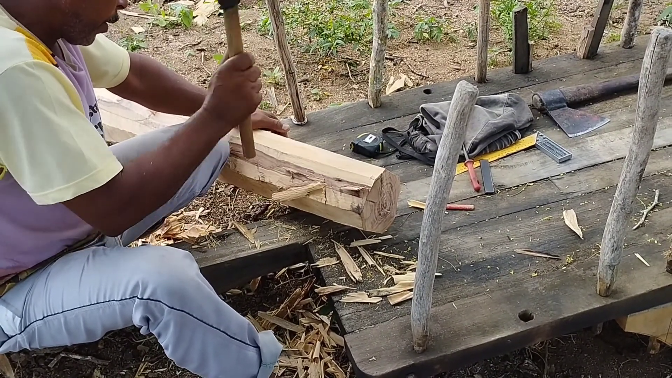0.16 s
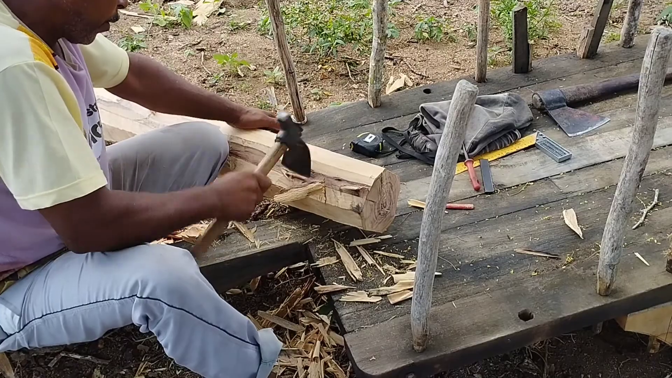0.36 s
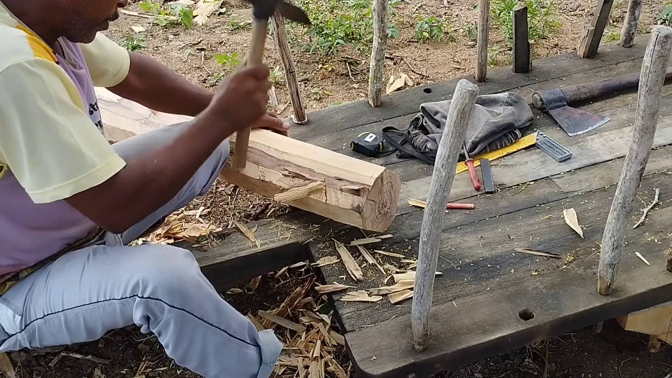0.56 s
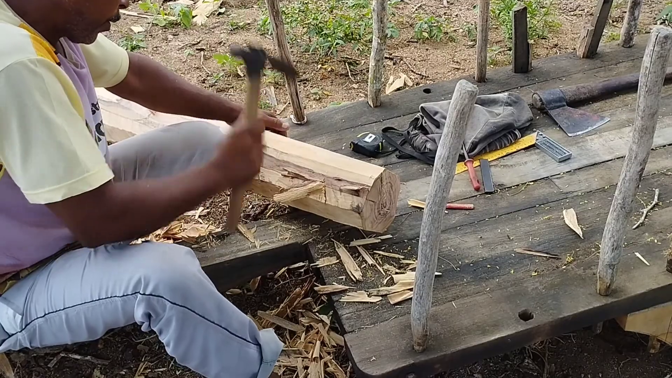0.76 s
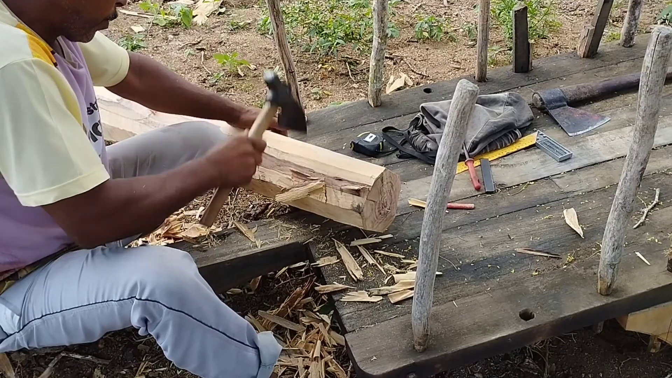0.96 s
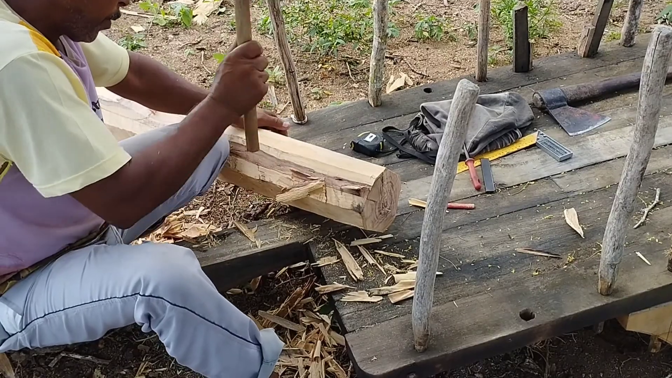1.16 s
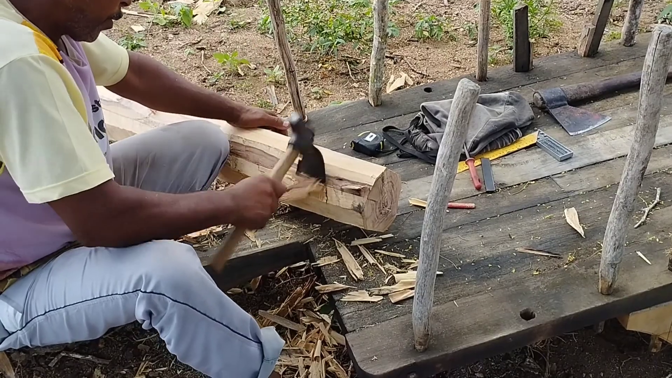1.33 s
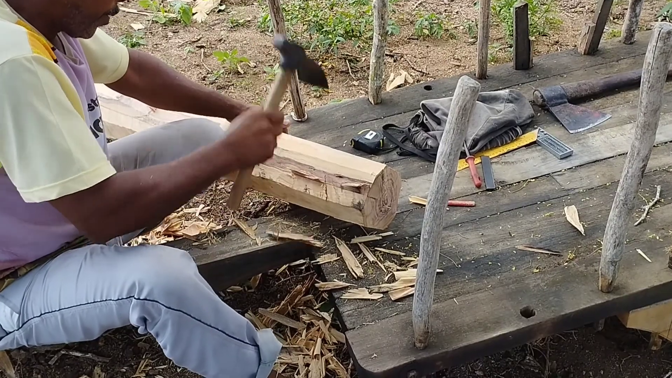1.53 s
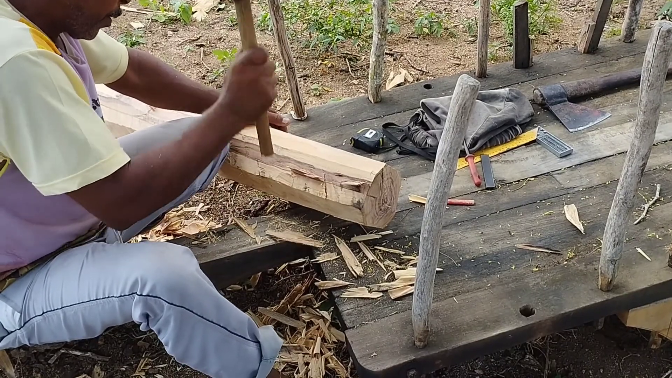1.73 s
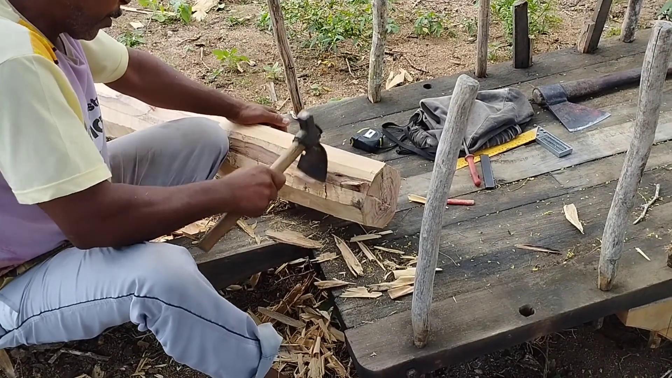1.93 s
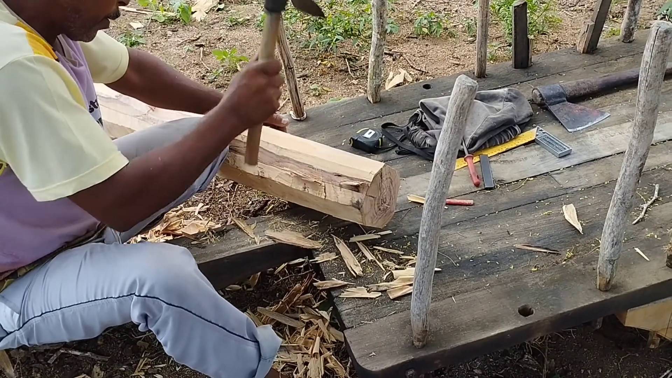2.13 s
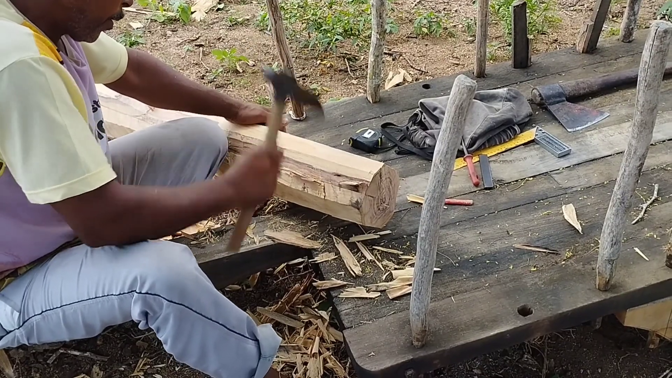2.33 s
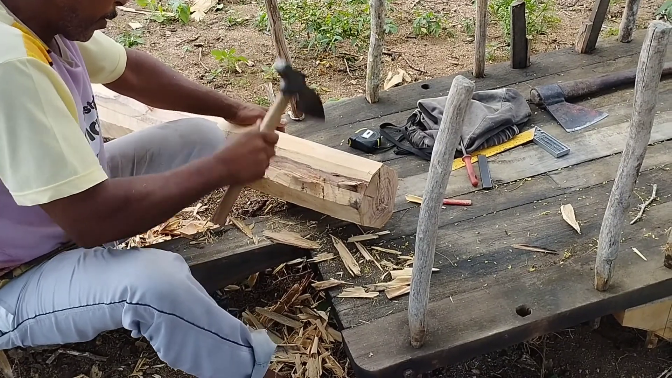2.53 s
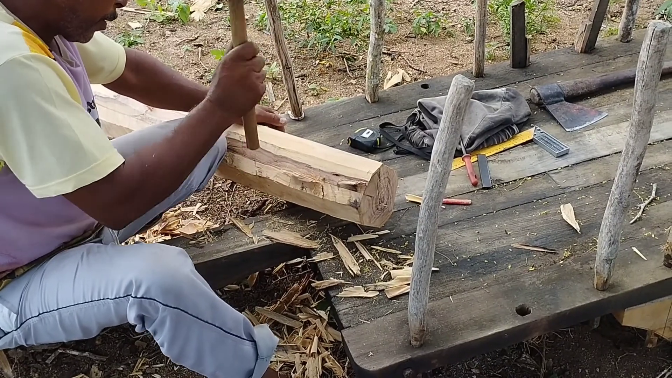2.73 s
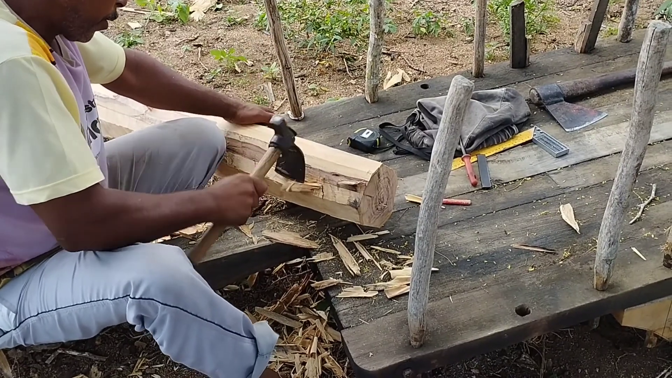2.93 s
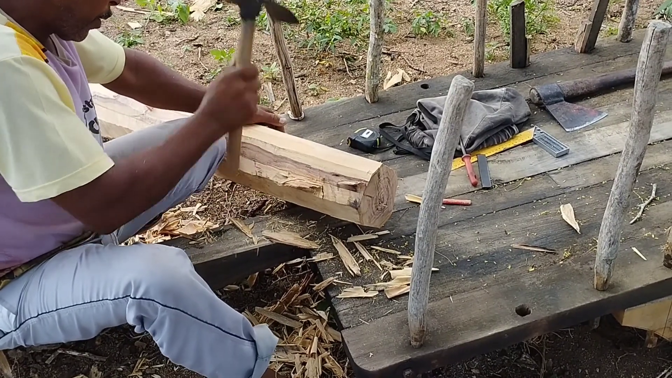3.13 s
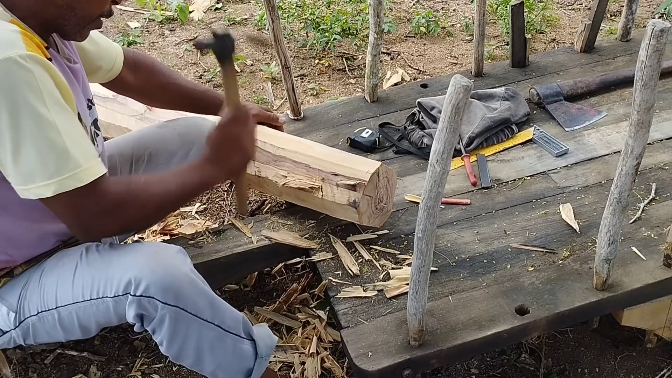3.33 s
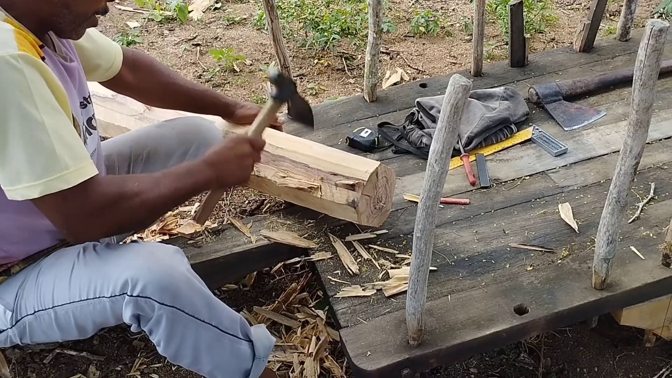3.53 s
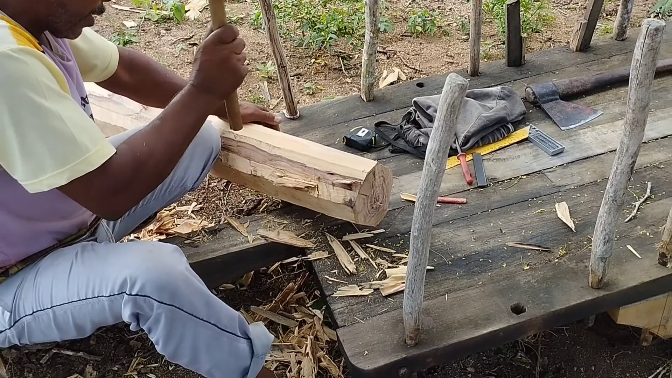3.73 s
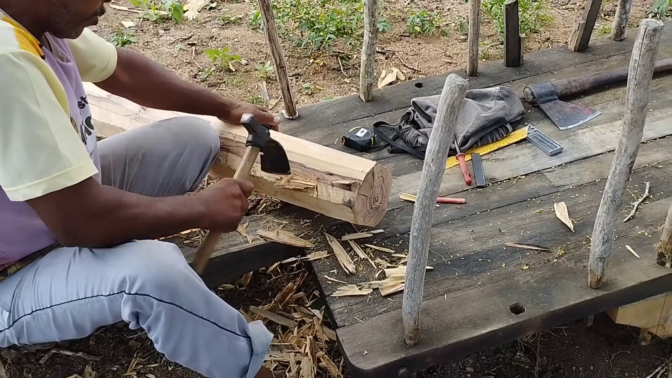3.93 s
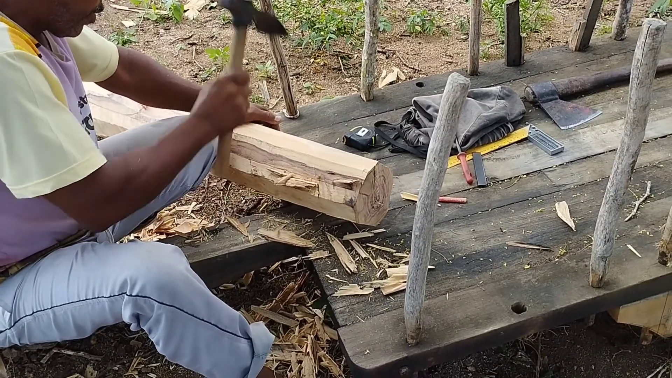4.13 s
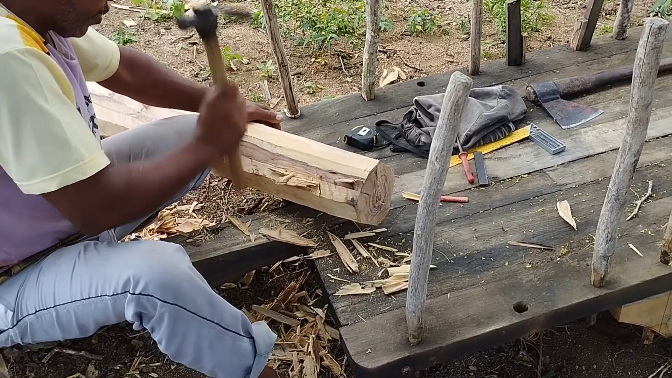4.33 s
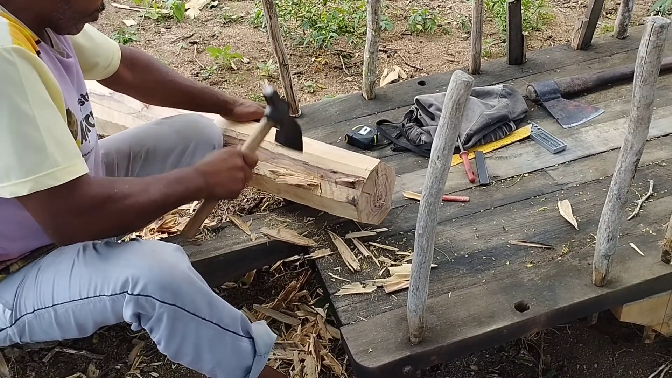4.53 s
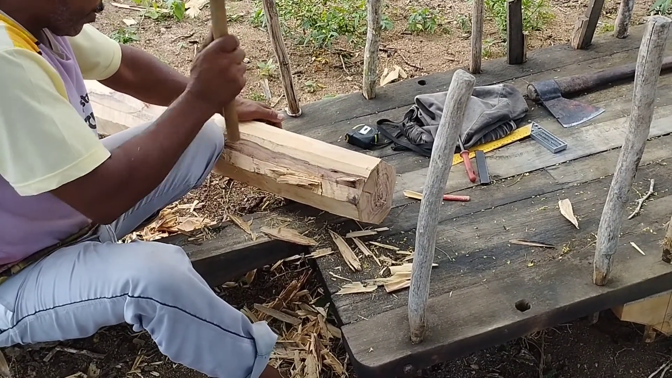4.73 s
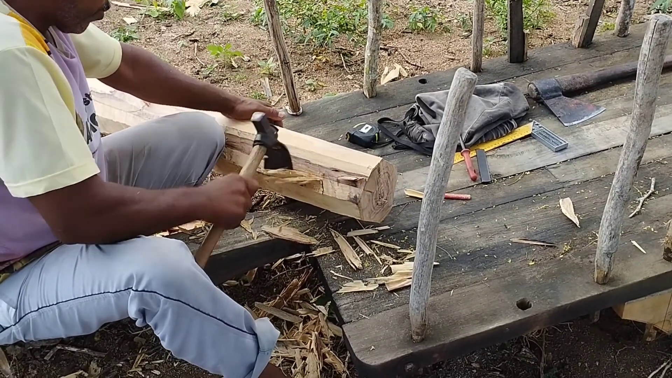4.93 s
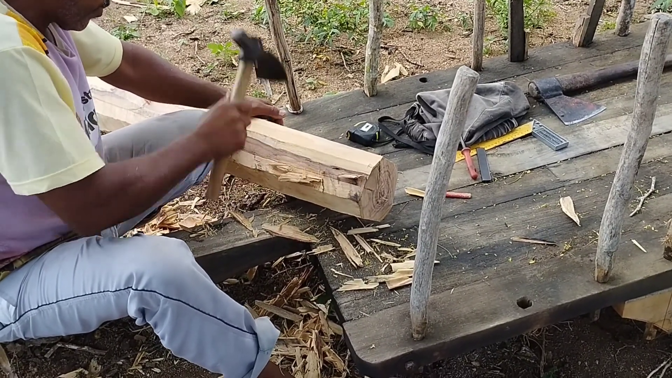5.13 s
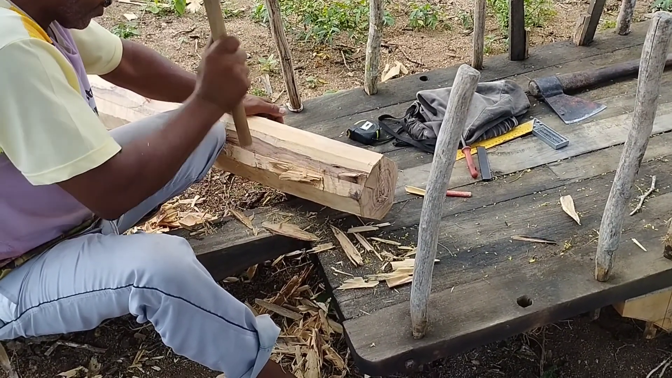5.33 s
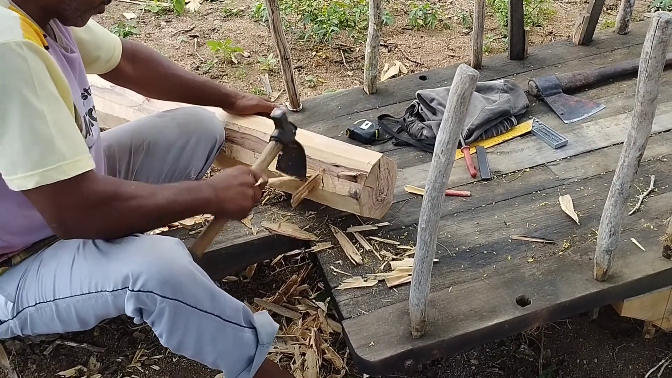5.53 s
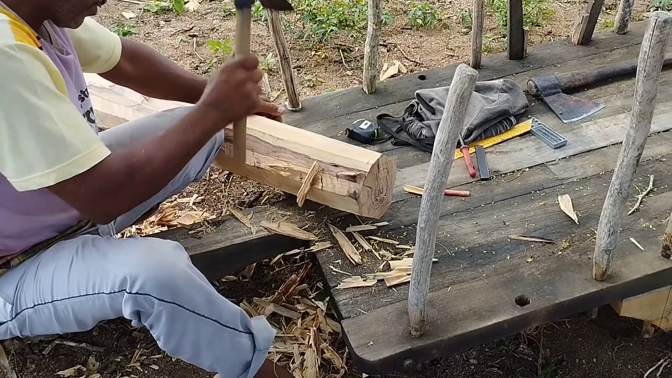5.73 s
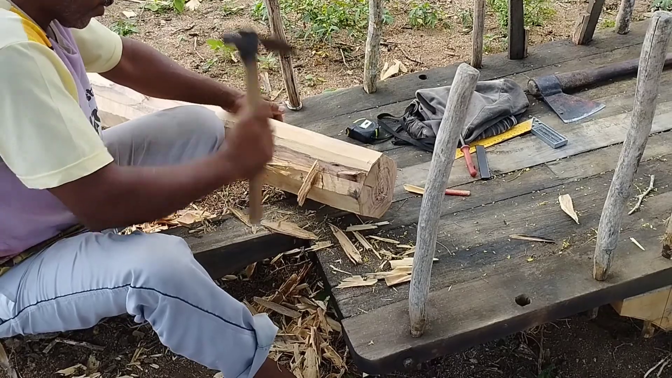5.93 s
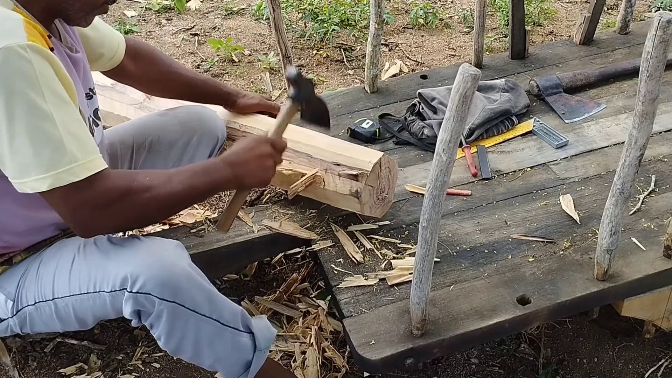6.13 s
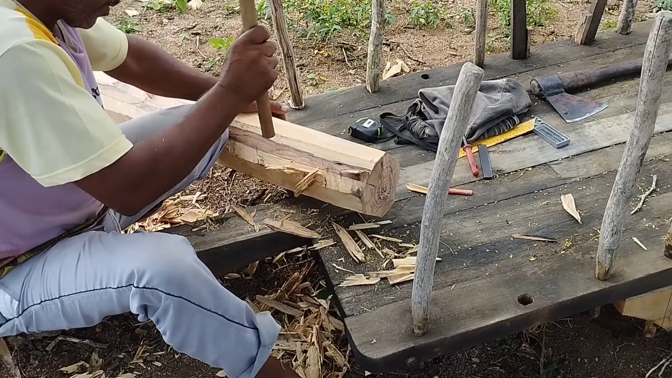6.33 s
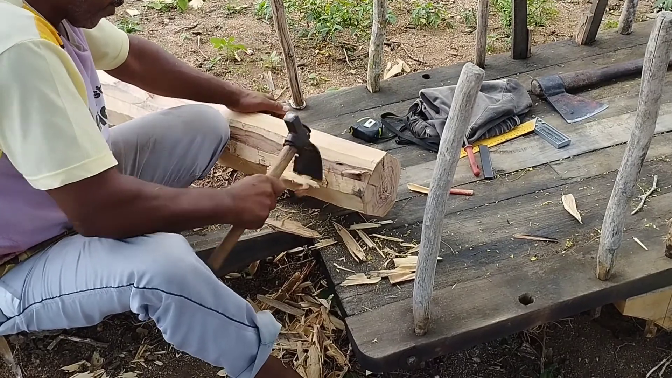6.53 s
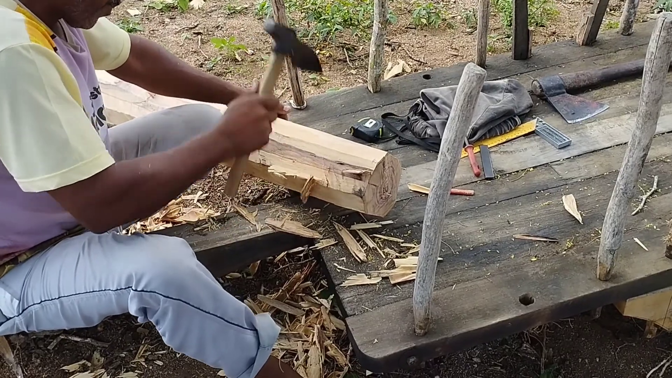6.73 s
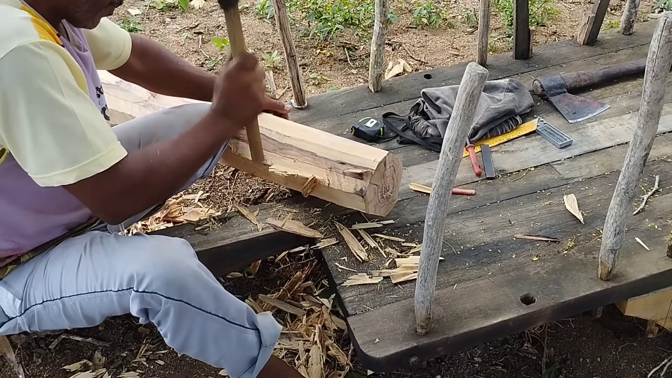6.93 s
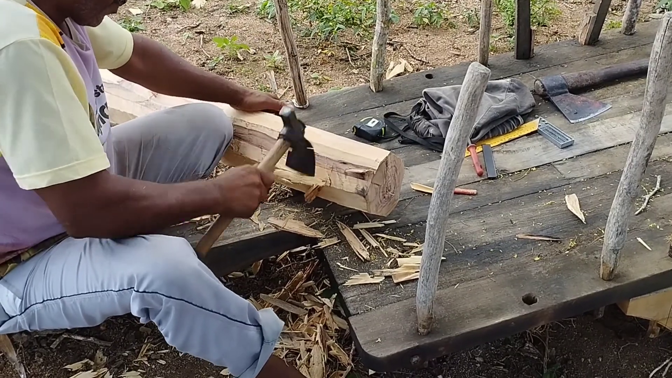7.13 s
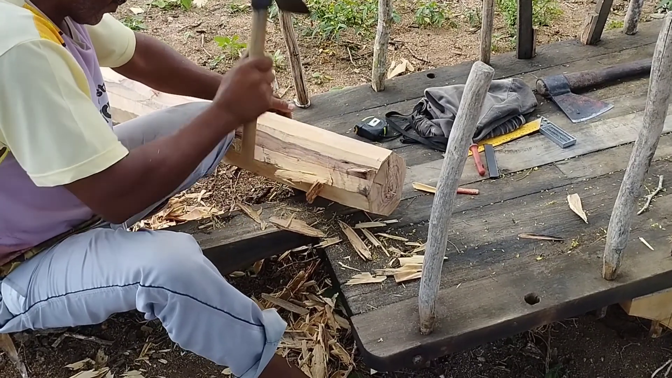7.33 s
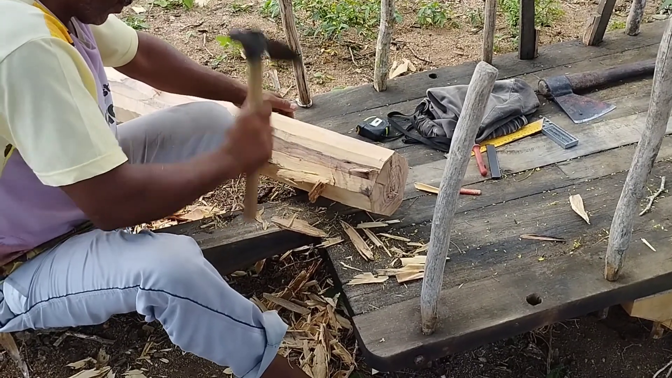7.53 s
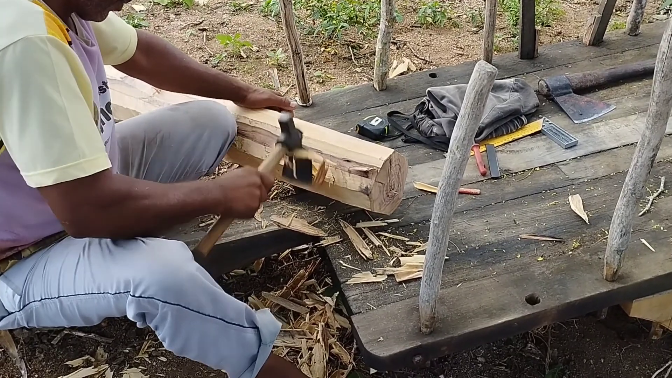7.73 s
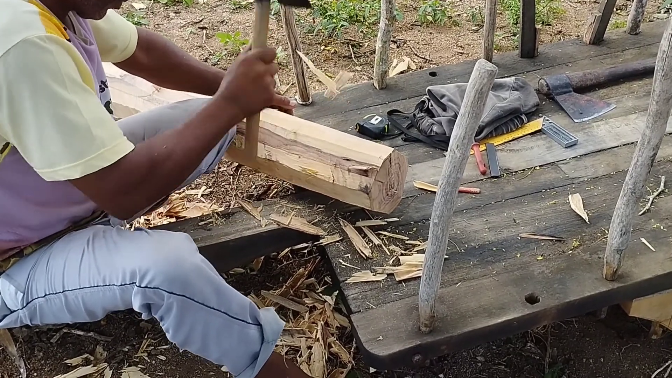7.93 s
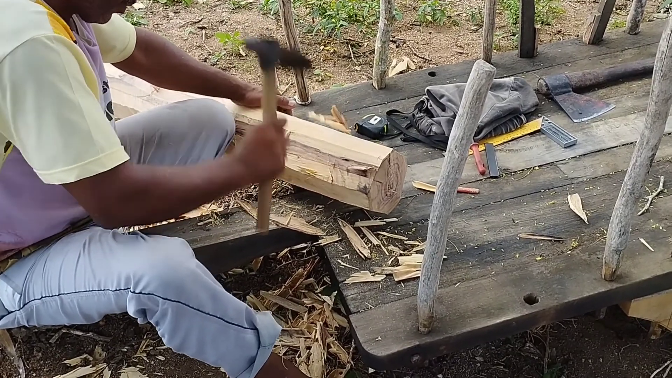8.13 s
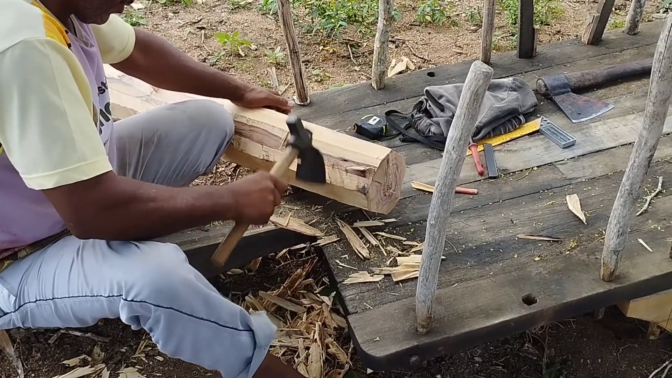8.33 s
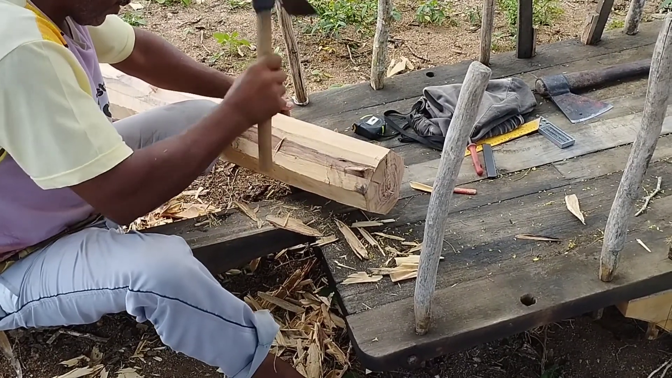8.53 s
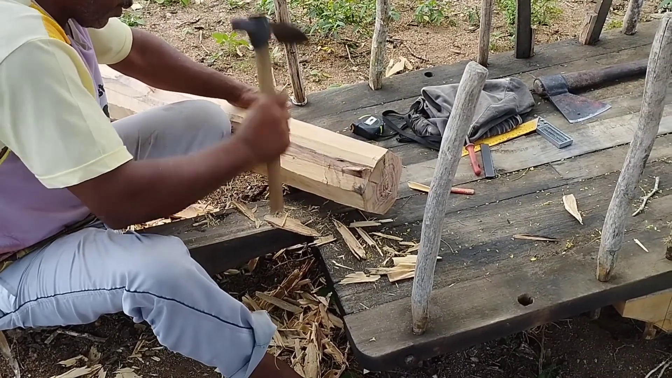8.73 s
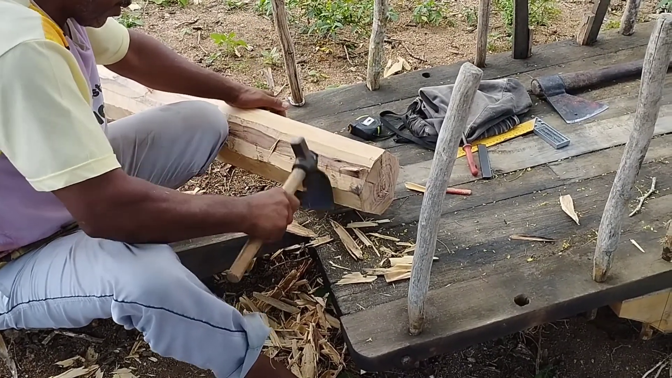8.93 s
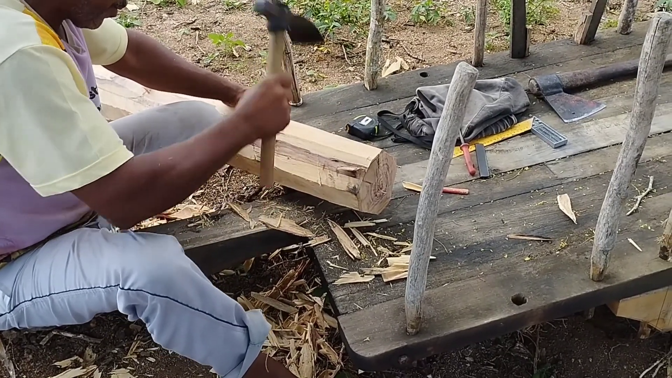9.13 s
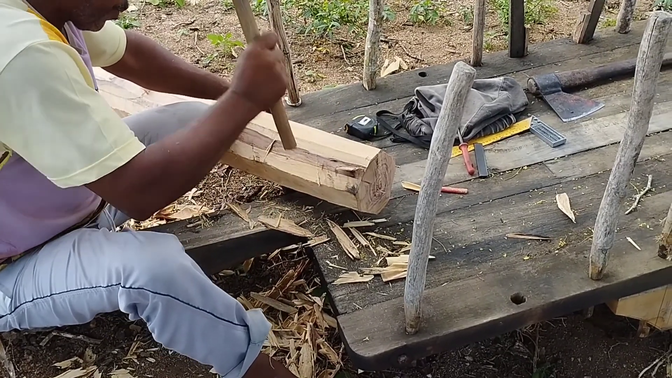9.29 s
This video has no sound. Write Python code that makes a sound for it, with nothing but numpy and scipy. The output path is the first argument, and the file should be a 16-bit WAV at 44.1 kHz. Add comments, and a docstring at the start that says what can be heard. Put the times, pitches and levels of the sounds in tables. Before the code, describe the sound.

Steady close chopping on a small log over a plank deck, each crack with a short thump and rattle, faint birdsong and light wind behind.

```python
"""Light wind, leaf hiss and a far low drone run throughout, as shaped noise; two tones waver in the drone.
A songbird note, a gliding sine, opens; chirps stay close until 5.4 s, then song comes from the trees.
From 0.34 s to 8.84 s a hand adze chops a small log on a plank deck, close to a two-port microphone:
noise cracks, decaying sines thump, and random knocks rattle log and tools through their resonances.
Chips tick, cloth scuffs, and the steel blade sings shortly after some blows or, in the last two, from the
blow itself; the last birds call after the chopping."""
import sys
import numpy as np
from scipy import signal
from scipy.fft import rfft, irfft, next_fast_len
from scipy.io import wavfile
from scipy.ndimage import uniform_filter1d, map_coordinates

SR = 44100
rng = np.random.default_rng(int(sys.argv[2]) if len(sys.argv) > 2 else 0)


def unload_audio(sound):
    """Save the sound as a 16-bit wav file, at the path given as the first command line argument."""
    columns = np.transpose(np.atleast_2d(sound))
    # keep every value between -1 and 1, then stretch to whole-number steps
    steps = np.round(np.clip(columns, -1, 1) * 32767)
    wavfile.write(sys.argv[1], SR, steps.astype(np.int16))


N = 417186  # samples

# The air bed over time. Each row: time in seconds, wind level in dB before a 4 dB lift,
# drone level in dB, leaf level in dB before a 4 dB lift.
AIR_LEVELS = [(0.0, -58, -49.5, -65.5), (1.4, -63, -53, -76), (2.05, -62.5, -49.5, -67),
              (3.82, -52.5, -50, -74.5), (4.69, -55, -48, -68.5), (7.27, -54, -50.5, -71.5),
              (9.46, -52.5, -54, -73)]
# Wind buffeting the ports. Each row: frequency in Hz, relative density in dB per Hz.
WIND_SPECTRUM = [(12, -31.5), (20, 4), (57, 0.5), (189, -20.5), (200, -22.5), (260, -52), (440, -120)]
# The far drone. Each row: frequency in Hz, relative density in dB per Hz.
DRONE_SPECTRUM = [(35, -36), (60, -2.5), (86, -4.5), (114, -2.5), (185, -0.5), (260, -15.5), (326, -15),
                  (655, -24.5), (704, -29), (777, -29), (1260, -41), (1800, -39), (2340, -66), (3960, -120)]
# Wavering tones inside the drone. Each row: centre pitch in Hz, mean level in dB against the drone.
DRONE_TONES = [(140, -10.5), (197, -11)]
# The hiss of leaves. Each row: frequency in Hz, relative density in dB per Hz.
LEAF_SPECTRUM = [(590, -38.5), (1000, -12), (1720, -17), (2590, -7), (3270, -17), (4330, -14),
                 (4820, -17.5), (7010, -17.5), (8260, -25), (15200, -28.5), (16500, -24)]
# How alike the two ports hear drone and leaves. Each row: frequency in Hz, likeness from -1 to 1.
PORT_LIKENESS = [(60, 0.62), (150, 1), (380, 0.67), (950, 0.06), (2380, -0.47), (5980, -0.41),
                 (15000, 0.17)]
# Shading by the housing, scaled for each source. Each row: frequency in Hz, left minus right in dB.
PORT_SHADING = [(60, 4.3), (700, 4.9), (1400, 0), (2800, -4), (5600, -4), (10000, -1), (14000, 3.4)]
# Head start of the left port, scaled for each source. Each row: frequency in Hz, phase lead in radians.
PORT_LEAD = [(60, .04), (300, .2), (700, .5), (1400, .8), (2800, 1.35), (3600, 1.8), (4800, 4.4), (7000, 5),
             (16000, 5.2)]

# Bird notes. Each row: start in seconds, shape name, length in seconds, reference pitch in Hz,
# level in dB before a 3.5 dB lift.
BIRD_NOTES = [(0, "hold", 0.18, 4543, -72), (0.458, "kick", .044, 6940, -55),
              (0.556, "rise", 0.05, 6670, -53), (0.662, "arch", 0.048, 5800, -57),
              (.761, "rise", 0.04, 6446, -50), (0.955, "arch", 0.066, 4800, -64),
              (1.09, "rise", 0.019, 4500, -64), (1.147, "rise", .017, 4180, -72),
              (1.292, "arch", 0.04, 5900, -65.5), (2.541, "hold", 0.11, 4107, -70),
              (2.713, "arch", 0.084, 5380, -69), (3.381, "spike", .045, 9350, -55),
              (4.07, "spike", 0.035, 8780, -51), (4.101, "hook", .13, 4000, -70.5),
              (4.222, "rise", .018, 5600, -66), (4.277, "rise", 0.039, 5930, -63.5),
              (4.342, "slide", .04, 4700, -64), (4.585, "arch", 0.039, 5560, -65),
              (4.624, "slide", 0.016, 6070, -57), (4.703, "arch", .046, 5420, -60),
              (4.737, "hold", 0.024, 5970, -57.5), (4.77, "hold", 0.069, 3880, -69),
              (4.82, "slide", 0.043, 5080, -56), (4.859, "rise", .022, 7300, -55.5),
              (5.175, "rise", 0.07, 5630, -56), (5.242, "fall", .045, 5150, -52.5),
              (5.243, "fall", 0.031, 3490, -67), (5.309, "kick", 0.025, 7080, -52),
              (5.367, "slide", 0.077, 3750, -64.5), (5.445, "fall", 0.059, 7300, -69),
              (5.55, "dip", .05, 4590, -54.5), (5.616, "hold", 0.095, 4970, -59.5),
              (5.666, "slide", 0.1, 3360, -66.5), (5.824, "dip", 0.052, 4700, -56.5),
              (5.851, "hook", 0.093, 4480, -62), (5.908, "hold", .11, 4960, -62),
              (6.096, "fall", 0.043, 5150, -58.5), (6.21, "hook", 0.1, 3980, -65.5),
              (6.306, "hold", 0.072, 5720, -71), (6.365, "slide", 0.056, 4470, -69),
              (6.444, "hold", 0.076, 4435, -63.5), (6.661, "slide", 0.1, 6400, -63),
              (6.746, "hold", 0.1, 4350, -66.5), (6.903, "fall", .06, 6470, -69.5),
              (6.945, "slide", 0.076, 5420, -59), (7.029, "slide", .05, 4380, -66.5),
              (7.266, "fall", .14, 3934, -62), (7.305, "hold", 0.086, 4270, -65),
              (7.505, "hook", 0.082, 5230, -58), (7.715, "fall", 0.076, 3780, -61.5),
              (7.841, "fall", 0.064, 5260, -57.5), (7.965, "hook", .11, 3825, -62),
              (8.037, "slide", 0.022, 4600, -66), (8.087, "slide", 0.017, 4720, -66),
              (8.139, "slide", 0.061, 5170, -60), (8.371, "arch", .11, 3600, -63.5),
              (8.412, "hold", 0.11, 8210, -69.5), (8.58, "slide", .15, 4250, -74),
              (8.605, "fall", 0.052, 5600, -68.5), (8.717, "hook", .13, 3850, -68),
              (8.745, "fall", .05, 5100, -67), (8.823, "hold", 0.019, 7250, -59),
              (8.943, "hold", 0.094, 2680, -70), (9.079, "hook", .095, 9700, -67.5),
              (9.082, "fall", 0.038, 4520, -74), (9.118, "rise", 0.046, 5114, -64.5),
              (9.14, "fall", 0.066, 3520, -77), (9.164, "fall", .07, 5040, -65.5),
              (9.194, "fall", 0.036, 8200, -63), (9.217, "rise", 0.0173, 4260, -65),
              (9.246, "hook", 0.035, 2750, -74), (9.294, "hook", .04, 2920, -72),
              (9.324, "hold", .069, 3248, -67.5), (9.37, "dive", 0.082, 8500, -67)]
# Glides by shape name. Each point: share of the note's length, share of its reference pitch.
NOTE_SHAPES = {"rise": [(0, 0.66), (.5, 0.77), (1, 0.95)], "slide": [(0, .83), (.5, .93), (1, 1)],
               "hold": [(0, .92), (.2, 0.97), (1, 0.96)], "arch": [(0, .7), (.5, 0.97), (1, 0.76)],
               "hook": [(0, .8), (.18, 0.97), (.7, .76), (1, .72)], "fall": [(0, .96), (.12, 0.96),
               (.55, .89), (1, .83)], "dive": [(0, .85), (.15, 0.93), (.55, .72), (1, .57)],
               "kick": [(0, 0.73), (.55, 0.77), (1, 0.94)], "dip": [(0, 0.9), (.45, .86), (1, 1)],
               "spike": [(0, .5), (.4, 0.99), (.55, .71), (1, .71)]}
# Cloth and shavings shifting. Each row: start in seconds, length in seconds, dull part in dB, bright part in dB.
SCUFF_EVENTS = [(0.059, 0.094, -66, -69.5), (1.004, .12, -79, -61), (5.0, 0.14, -77, -52.5),
                (7.697, 0.13, -79, -57.5), (7.88, 0.13, -56.5, -73.5)]
# Chips and tools that land or touch after a blow. Each row: start in seconds, starting level in dB.
TICK_EVENTS = [(0.9931, -43.5), (1.0441, -45.5), (1.4296, -40), (1.947, -37), (2.7217, -44.5),
               (4.535, -36.5), (5.0685, -40), (6.6101, -37.5), (6.774, -49), (7.6828, -38), (8.123, -50),
               (8.3992, -49), (8.4746, -51), (8.6094, -48), (9.2083, -56)]
# The blade sings, shortly after a blow or, in the last two rows, from the blow itself.
# Each row: start in seconds, level in dB added to the blade modes, extra damping by the wood in dB per second.
BLADE_RINGS = [(.91, -74, 200), (1.39, -61.5, 202), (4.5, -71, 230), (5.06, -67, 210), (6.601, -66, 198),
               (8.212, -56, 39), (8.84, -63, 53)]
# Lower and upper mode of the steel blade. Each row: frequency in Hz, relative level in dB,
# undamped 60 dB decay time in seconds.
BLADE_MODES = [(9470, 17, 0.32), (9970, 14.5, 0.19)]

# The adze blows. Each row: time in seconds, crack level in dB, crack tilt in dB per octave, thump level in dB,
# rattle level in dB, time in seconds at which the rattle drops away, left minus right in dB.
ADZE_BLOWS = [(0.3373, -5, -1, -5, -17.5, 0.072, -1.5), (0.843, -3, 1, -9, -20, 0.093, -1),
              (1.3615, -4.5, 1.5, -12.5, -22.5, 0.06, 2.5), (1.8805, -3, 0, -10.5, -22, 0.055, 3.5),
              (2.3907, -8.5, 1.5, -8, -16.5, 0.12, 0), (2.901, -4, -0.1, -10, -19, 0.083, -1),
              (3.4194, -1.5, 0.5, -11.5, -18.5, 0.089, -1.5), (3.929, -3, 0, -10.5, -19, 0.08, 0),
              (4.431, -4, 0, -5.5, -15, 0.083, -1.5), (4.9495, -2, 1.5, -8.5, -17, 0.08, 0),
              (5.4832, -4, 0.2, -12.5, -20, 0.081, 2), (6.0117, -2, -0.6, -11.5, -18.5, 0.085, 1),
              (6.538, -3, 1.5, -9, -18, 0.083, 0), (7.0673, -3.5, 0, -7, -16.5, 0.081, -1.5),
              (7.614, -3.5, -1, -17.5, -25.5, 0.073, -1), (8.2112, -2.5, 0, -9.5, -17.5, 0.093, -3),
              (8.8366, -8, -3, -16, -21.5, 0.088, -4.5)]
# Fibres cracking. Each row: frequency in Hz, relative density in dB per Hz.
CRACK_SPECTRUM = [(240, -14.5), (400, -10.5), (669, -9), (2020, 0), (3700, -1.5), (4190, -3.5),
                  (5550, -0.5), (6090, -7.5), (6800, -6), (7940, -26.5), (9420, -9.5), (11500, -21.5),
                  (15000, -12), (16500, -43.5)]
# Flying chips. Each row: frequency in Hz, relative density in dB per Hz.
SPRAY_SPECTRUM = [(470, -26.5), (800, 0.5), (1320, -27.5), (2050, 1.5), (2910, -5), (3420, -6.5),
                  (4400, 0.5), (11000, -25), (16000, -19.5)]
# Planks bending. Each row: frequency in Hz, mean relative level in dB, 60 dB decay time in seconds.
DECK_MODES = [(136, 7, 0.092), (116, 3.5, 0.092), (80.3, -6.5, 0.22), (66, -6, 0.2)]
# Resonances of the log. Each row: frequency in Hz, width in Hz, relative level in dB.
LOG_MODES = [(130, 50, -10), (229.5, 36.2, -0.5), (306, 34.6, -2), (374, 61, -9.5), (594, 54, -11.5),
             (927, 200, -23), (1270, 220, -25)]
# Resonances of the loose tools. Each row: frequency in Hz, width in Hz, relative level in dB.
TOOL_MODES = [(1890, 120, -1), (2587, 110, 2.5), (3000, 230, -4.5), (4610, 43, 4.5), (5440, 280, -4.5),
              (6700, 1000, -6)]

# tools clink at CLINK_DB when the log rattles at USUAL_RATTLE_DB, and grow faster than the rattle (dB per dB)
USUAL_RATTLE_DB, CLINK_DB, CLINK_GROWS = -19, -30, 1.8
SPRAY_DB = -47  # chips fly off this far under the crack
TILT_PIVOT_HZ = 3500  # the crack tilt leaves this frequency alone
UPPER_DB, UPPER_LOSS_S = 10.5, 0.058  # lift of the blade's upper mode; damping (dB/s) times this weakens it
NEAR_UNTIL_S = 5.4  # the chirping bird sits close until then; later song comes from the trees
SLAP_S, SLAP_DB = 0.012, -5.5  # a nearby surface doubles each note
# faint quick upstrokes scattered through the song: each takes 1.2 to 1.6 times the base pitch, 0 to 8 dB softer
TWITTER_COUNT, TWITTER_S, TWITTER_BASE_HZ, TWITTER_LOUDEST_DB = 30, 0.017, 4640, -69
TOP_HZ = 16800  # band limit


def amp(db):
    """Gain of a dB value."""
    return 10 ** (np.asarray(db) / 20)


def unit(x):
    """x at rms 1."""
    return x / np.sqrt(np.mean(x ** 2) + 1e-20)


def along(points, hz):
    """Value at hz, read between (Hz, value) points on a log axis."""
    f, v = np.transpose(points)
    return np.interp(np.log(hz + 1), np.log(f + 1), v)


def wobble(rate):
    """A smooth random curve over the whole scene, rate knots a second."""
    return map_coordinates(rng.standard_normal(int(N * rate / SR) + 4), [np.arange(N) * rate / SR])


def lumps(t, rate):
    """A smooth random curve over one blow, rate knots a second."""
    return map_coordinates(rng.standard_normal(80), [t * rate])


def filtered(x, response):
    """x times a complex response of frequency."""
    m = next_fast_len(x.shape[-1] + 8192)
    return irfft(rfft(x, m) * response(np.fft.rfftfreq(m, 1 / SR)), m)[..., :x.shape[-1]]


def noise(spectrum, size):
    """Coloured noise of rms 1."""
    return unit(filtered(rng.standard_normal(size), lambda hz: amp(along(spectrum, hz))))


def body(modes):
    """Causal response of (Hz, width, dB) resonances with alternating signs."""
    def response(f):
        total = 0
        for k, (centre, width, db) in enumerate(modes):
            damping = 1j * f * width
            total = total + (-1) ** k * amp(db) * damping / (centre * centre - f * f + damping)
        return total
    return response


def knocks(force, modes, rate, scatter_db):
    """Irregular impulses, rate a second and as strong as force, ringing out in a body."""
    struck = rng.random(len(force)) < rate / SR
    strength = amp(rng.normal(0, scatter_db, len(force)))
    hits = struck * strength * rng.choice([-1, 1], len(force))
    steady, shaped = filtered(np.array([hits, hits * force]), body(modes))
    return shaped / np.std(steady)


def ring(modes, t, spread_db):
    """Decaying sines, each at a new strength."""
    total = 0
    for hz, db, t60 in modes:
        level_db = db + rng.normal(0, spread_db) - 60 * t / t60
        total = total + amp(level_db) * np.sin(2 * np.pi * hz * t)
    return total


def add(track, s, sound):
    """Mixes sound into track from time s."""
    part = track[round(s * SR):][:len(sound)]
    part += sound[:len(part)]


def ports(x, lead, shade):
    """One source at both ports: the left hears it earlier, the housing colours each port differently."""
    side = np.array([[1], [-1]])

    def response(hz):
        gain = amp(side * shade * along(PORT_SHADING, hz) / 2)
        return gain * np.exp(0.5j * side * lead * along(PORT_LEAD, hz))
    return filtered(x, response)


def rush(spectrum, alike, shade, patchy_db):
    """Stereo noise, patchy in time and pitch, of rms 1 in the mean of both ports."""
    z = signal.stft(rng.standard_normal((2, N)), nperseg=512)[2]
    field = uniform_filter1d(rng.standard_normal(z.shape[1:]), 8, axis=0)
    field = uniform_filter1d(field, 12, axis=1)
    raw = signal.istft(z * amp(patchy_db * unit(field)), nperseg=512)[1][:, :N]

    def mid_side(hz):
        # the less alike the ports, the more side signal
        turn = np.arccos(np.clip(along(alike, hz), -0.5, 1)) / 2
        return amp(along(spectrum, hz)) * [1 + 0 * hz, np.tan(turn)]
    mid, side = filtered(raw, mid_side)
    pair = filtered(np.array([mid + side, mid - side]),
                    lambda hz: amp([[shade], [-shade]] * along(PORT_SHADING, hz) / 2))
    return pair / np.std(pair.mean(0))


def wind(level_db):
    """Wind lumps on the ports: low noise with a shared slow sway and faster gusts at each port."""
    gusts_db = wobble(5) + 0.67 * np.array([wobble(20), wobble(14)])
    return amp(level_db + 4 + gusts_db) * rush(WIND_SPECTRUM, [(30, 0.4)], shade=0.5, patchy_db=2.5)


def far_drone(level_db):
    """Swaying low noise with tones that waver in pitch and level."""
    drone = amp(level_db + 0.9 * wobble(5)) * rush(DRONE_SPECTRUM, PORT_LIKENESS, shade=0.3, patchy_db=1.5)
    for hz, db in DRONE_TONES:
        gain = amp(level_db + db + 3 * wobble(2.5))
        drone = drone + gain * np.sin(2 * np.pi * np.cumsum(hz + 3 * wobble(1.9)) / SR)
    return drone


def leaves(level_db):
    """Leaf hiss: patchy bright noise, stirring slowly."""
    stir_db = 0.7 * wobble(4)
    return amp(level_db + 4 + stir_db) * rush(LEAF_SPECTRUM, PORT_LIKENESS, shade=3.5, patchy_db=3)


def air():
    """The bed: wind, drone and leaves riding their level curves."""
    s, *levels = np.transpose(AIR_LEVELS)
    wind_db, drone_db, leaves_db = (np.interp(np.arange(N) / SR, s, c) for c in levels)
    return wind(wind_db) + far_drone(drone_db) + leaves(leaves_db)


def trees(x, t60):
    """Trunks and leaves scatter sound into a diffuse tail, new at each port."""
    t = np.arange(SR // 2) / SR
    tail = rng.standard_normal((2, len(t))) * amp(-60 * t / t60) * np.clip(t / 0.01, 0, 1)
    return signal.fftconvolve(x[None], tail / np.linalg.norm(tail[0]), axes=1)[:, :N]


def birds():
    """Gliding sines, steep ones hoarse with a weak undertone; the near bird's steep chirps echo less."""
    direct, sent, flutter = np.zeros(N), np.zeros(N), wobble(500)
    twitter = [(when * N / SR, "rise", TWITTER_S, TWITTER_BASE_HZ * (1.2 + 0.4 * high),
                TWITTER_LOUDEST_DB - 8 * soft)
               for when, high, soft in rng.random((TWITTER_COUNT, 3))]
    for s, shape, length, top_hz, db in BIRD_NOTES + twitter:
        u = np.linspace(0, 1, int(length * SR))
        glide = top_hz * np.interp(u, *np.transpose(NOTE_SHAPES[shape]))
        steep = np.clip(np.ptp(glide) / length / 40000, 0, 1)
        pitch = uniform_filter1d(glide, len(u) // 9, mode="nearest")
        shake = flutter[round(s * SR):][:len(u)]
        u = u[:len(shake)]  # notes stop at the end of the scene
        pitch = pitch[:len(shake)] + (30 + 170 * steep) * shake
        turn = 2 * np.pi * np.cumsum(pitch) / SR
        tone = np.sin(turn) + 0.089 * steep * np.sin(turn / 2)
        fades = np.clip(u / 0.086, 0, 1) * np.clip((1 - u) / 0.15, 0, 1)
        note = amp(db + 3.5) * fades * tone
        add(direct, s, note)
        add(direct, s + SLAP_S, amp(SLAP_DB) * note)
        send_db = -8 * steep if s < NEAR_UNTIL_S else -1
        add(sent, s, amp(send_db) * note)
    tremble = amp(2.5 * wobble(90))
    return direct * tremble, sent * tremble


def scuffs():
    """Cloth and shavings rubbing: grainy swells of dull and bright noise."""
    out = np.zeros(N)
    for s, length, dull_db, bright_db in SCUFF_EVENTS:
        u = np.linspace(0, 1, int(length * SR))
        dull = noise([(100, -31), (300, -1), (900, -7.5), (2000, -39), (5000, -52.5)], len(u))
        bright = noise([(800, -40), (2000, 0.5), (6000, 0.5), (9000, -12.5), (16000, -8.5)], len(u))
        swell = np.abs(np.sin(np.pi * u)) ** 0.68
        add(out, s, swell * (amp(dull_db) * dull + amp(bright_db) * bright))
    return out * amp(1.8 * wobble(70))


def ticks():
    """Small dry contacts: noise that dies within milliseconds."""
    out, t = np.zeros(N), np.arange(SR // 4) / SR
    for s, db in TICK_EVENTS:
        snap = noise(SPRAY_SPECTRUM, len(t)) + 0.32 * noise(CRACK_SPECTRUM, len(t))
        add(out, s, amp(db - 60 * t / 0.0081) * snap)
    return out


def blade():
    """The steel blade sings in two modes; damping by the wood shortens both and weakens the upper."""
    out, t = np.zeros(N), np.arange(SR // 4) / SR
    for s, db, damping_db in BLADE_RINGS:
        lower = ring(BLADE_MODES[:1], t, 1)
        upper = amp(UPPER_DB - UPPER_LOSS_S * damping_db) * ring(BLADE_MODES[1:], t, 1)
        add(out, s, amp(db - damping_db * t) * np.clip(t / 0.0037, 0, 1) * (lower + upper))
    return out


def crack(t, tilt_db):
    """Fibres breaking: a short noise burst under the edge, then bright dust as fibres snap on."""
    bite = np.clip(t / 0.0015, 0, 1) / (1 + (t / 0.0068) ** 6)  # the edge stops after a few ms
    # each blow's crack is brighter or duller by its own tilt
    colour = [(hz, db + tilt_db * np.log2(hz / TILT_PIVOT_HZ)) for hz, db in CRACK_SPECTRUM]
    burst = noise(colour, len(t)) * bite * amp(-5.5 - 60 * t / 0.05)
    dust = noise([(5000, -40), (8500, 0), (11000, -8), (16000, 0)], len(t)) * amp(-34 - 420 * t)
    return burst + dust


def deck_thump(t):
    """Planks bending: low decaying sines with a soft onset."""
    late = np.maximum(t - 0.0075, 0)  # the log takes a moment to load the planks
    return ring(DECK_MODES, late, 1.2) * (1 - np.exp(-(late / 0.005) ** 2))


def log_rattle(t, landings, length):
    """The log hops on the planks, knocking its own resonances, then settles."""
    hopping = landings * np.clip(t / 0.0089, 0, 1) * amp(-90 * t) / (1 + (t / length) ** 6)
    return knocks(hopping, LOG_MODES, rate=900, scatter_db=2.5)


def tool_clink(t, landings, length):
    """Loose tools, jolted at each landing of the log, knock their resonances."""
    jolted = landings * np.clip(t / 0.0044, 0, 1) * amp(-150 * t) / (1 + (t / length) ** 6)
    # the tools, thrown up by the blow, fall back
    jolted += 1.1 * amp(rng.normal(0, 2.2)) * np.exp(-((t - 0.031) / 0.0031) ** 2)
    struck = knocks(jolted, TOOL_MODES, rate=1800, scatter_db=3.5)
    return filtered(struck, lambda hz: 1 / (1 + 1j * hz / 9000) ** 5)


def chip_spray(t):
    """Chips flying off: clumpy, fading noise."""
    clumps = amp(2.5 * lumps(t, 90))
    return clumps * noise(SPRAY_SPECTRUM, len(t)) * amp(-40 * t) / (1 + (t / 0.19) ** 6)


def adze():
    """Each blow layers crack, deck thump, log rattle, tool clink and chip spray."""
    out, t = np.zeros((N, 2)), np.arange(SR // 2) / SR
    for s, crack_db, tilt_db, thump_db, rattle_db, length, pan_db in ADZE_BLOWS:
        clink_db = CLINK_DB + CLINK_GROWS * (rattle_db - USUAL_RATTLE_DB)
        landings = amp(1.9 * lumps(t, 130))  # shared by log and tools
        blow = amp(crack_db) * crack(t, tilt_db)
        blow += amp(thump_db) * deck_thump(t)
        blow += amp(rattle_db) * log_rattle(t, landings, length)
        blow += amp(clink_db) * tool_clink(t, landings, length)
        blow += amp(crack_db + SPRAY_DB) * chip_spray(t)
        add(out, s - 0.001, np.outer(blow, amp([pan_db / 2, -pan_db / 2])))
    # the small deck radiates little deep bass
    return filtered(out.T, lambda hz: (1j * hz / (1j * hz + 50)) ** 4)


def scene():
    """Air under all, birds around, work in front."""
    song, distant = birds()
    # leaves swallow the highest notes
    distant = filtered(distant, lambda hz: 1 / (1 + (hz / 6800) ** 6))
    echoes = amp(4) * trees(distant, t60=0.5)
    far = ports(song, lead=0.13, shade=2.6) + echoes * amp([[-3], [3]])
    work = adze() + ticks() + blade() + scuffs()
    bright = filtered(work.mean(0), lambda hz: hz ** 2 / (hz ** 2 + 700 ** 2) / (1 + (hz / 7000) ** 4))
    work_echoes = amp(-16.5) * trees(bright, t60=0.29) * amp([[-2.1], [2.1]])
    near = ports(work, lead=0.99, shade=1) + work_echoes
    return air() + far + near


def record(dry):
    """The input stage rounds the tallest peaks; nothing is kept above the band limit."""
    rounded = dry / (1 + np.abs(dry / 0.9) ** 5) ** (1 / 5)
    return filtered(rounded, lambda hz: hz < TOP_HZ)


dry = scene()
out = record(dry)
unload_audio(out)
```